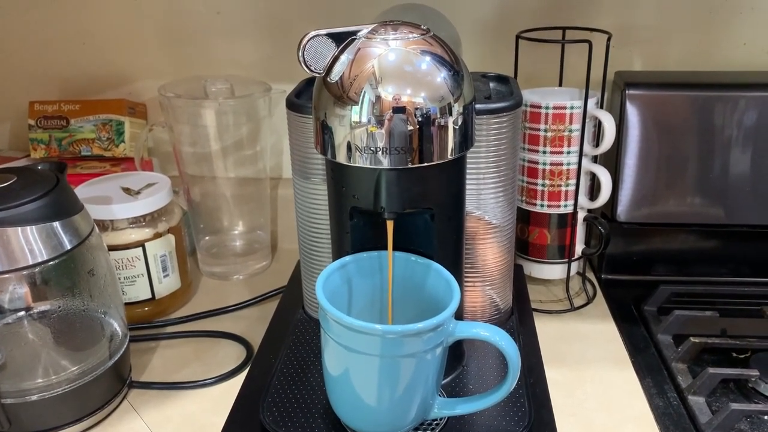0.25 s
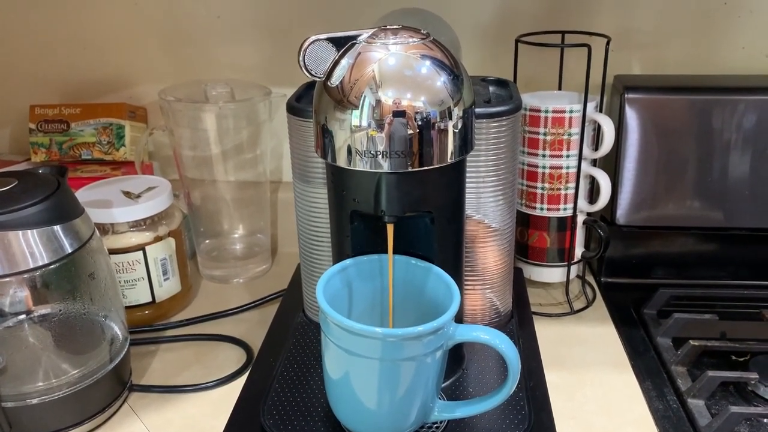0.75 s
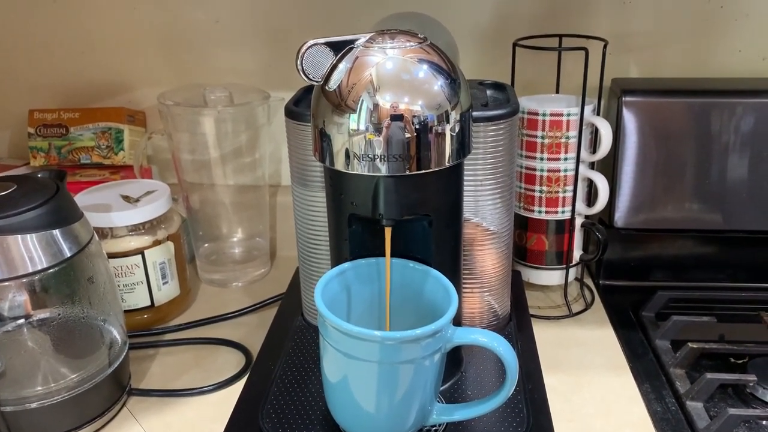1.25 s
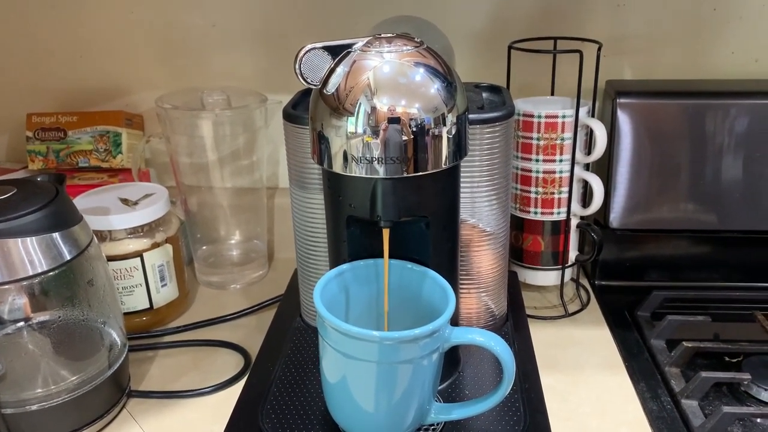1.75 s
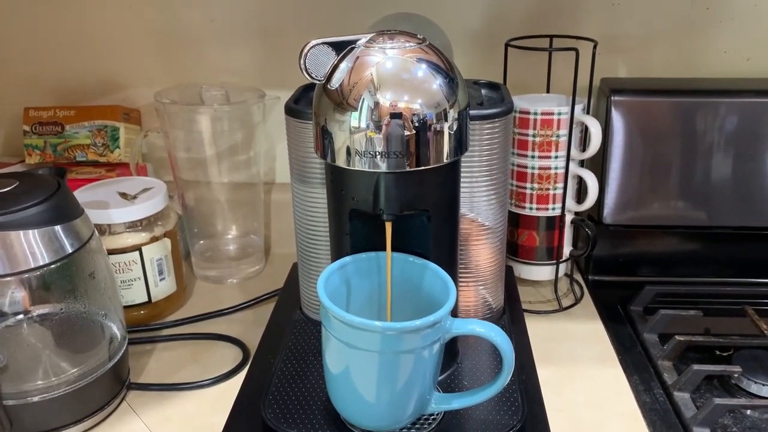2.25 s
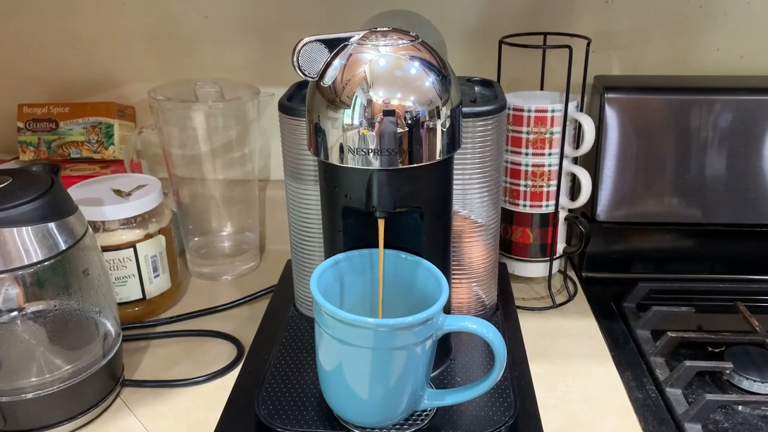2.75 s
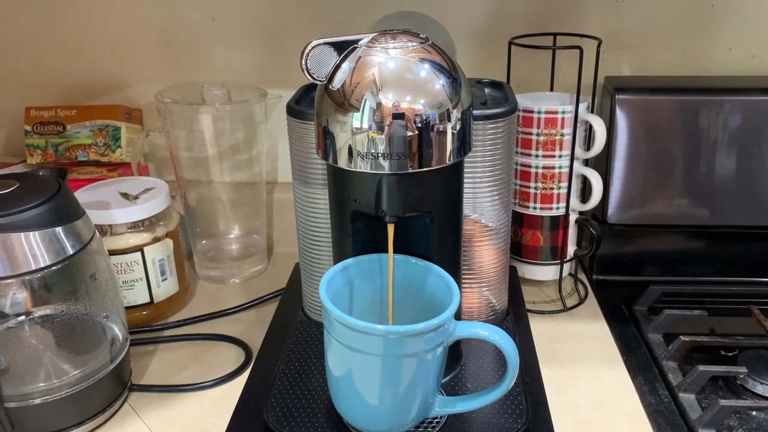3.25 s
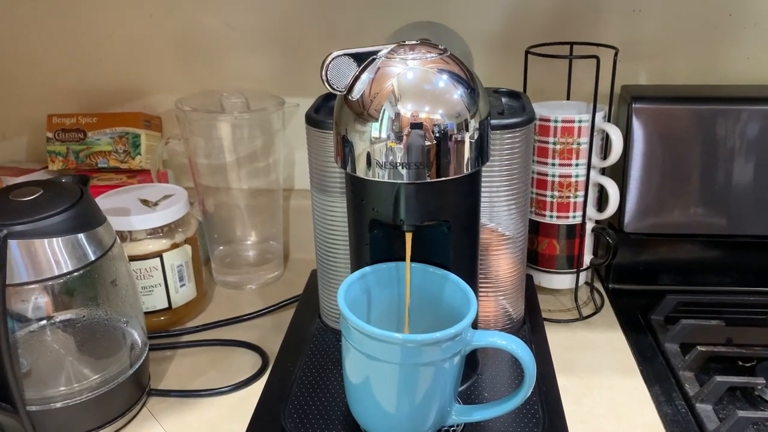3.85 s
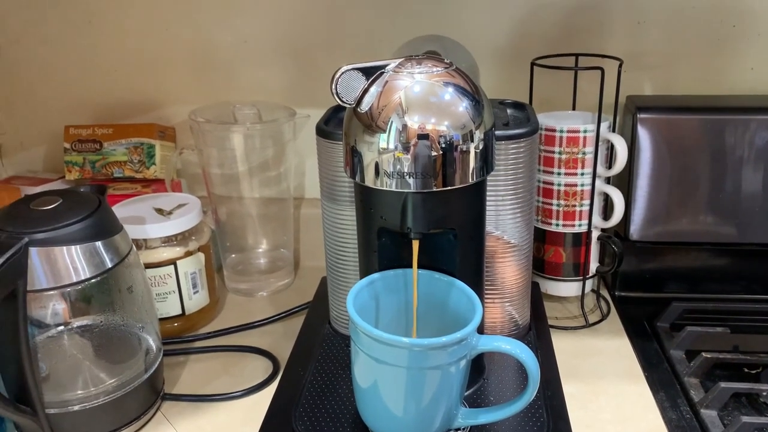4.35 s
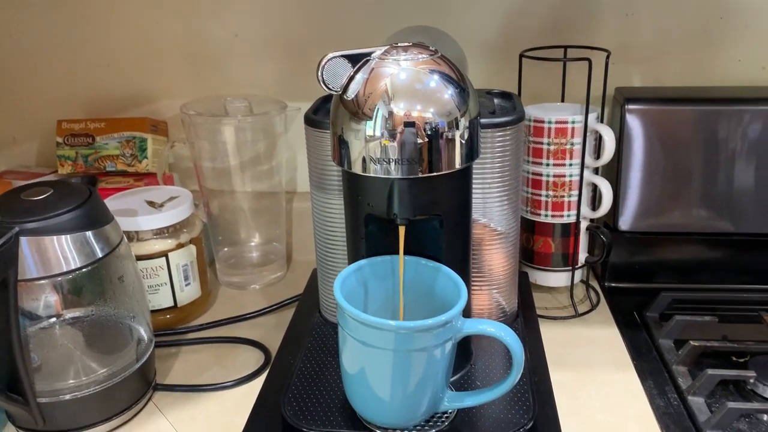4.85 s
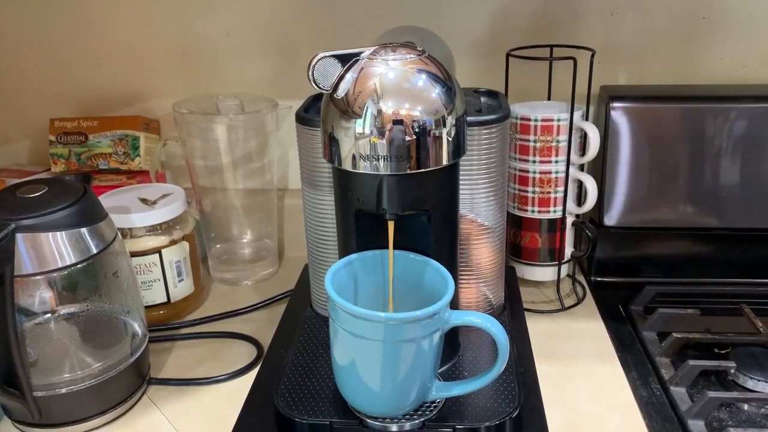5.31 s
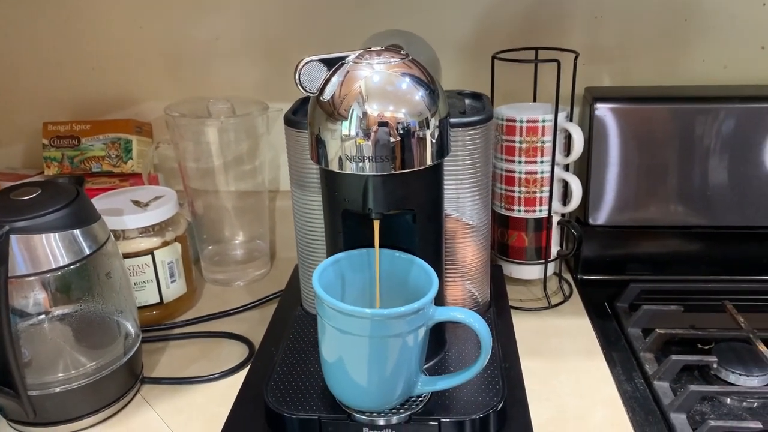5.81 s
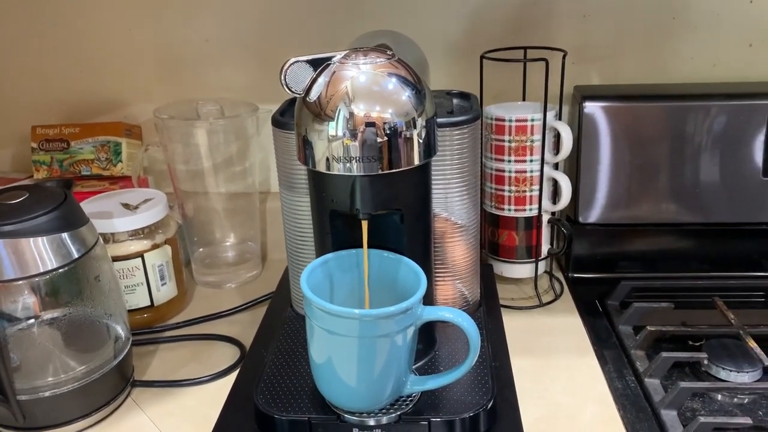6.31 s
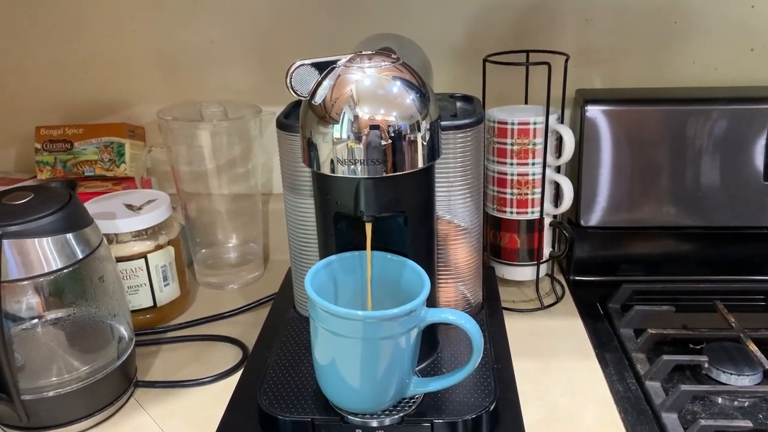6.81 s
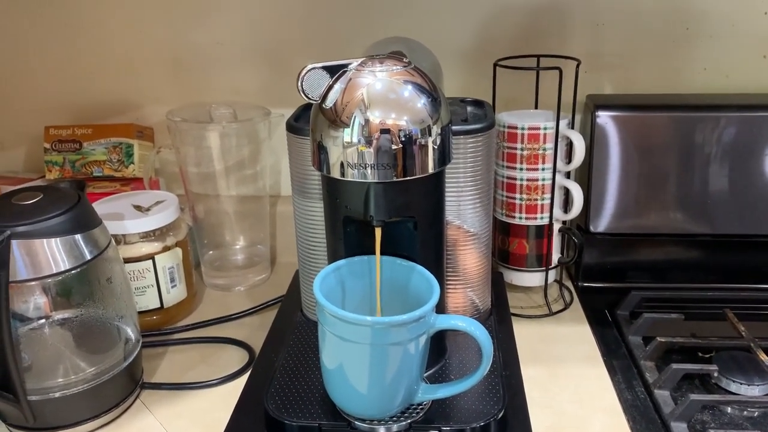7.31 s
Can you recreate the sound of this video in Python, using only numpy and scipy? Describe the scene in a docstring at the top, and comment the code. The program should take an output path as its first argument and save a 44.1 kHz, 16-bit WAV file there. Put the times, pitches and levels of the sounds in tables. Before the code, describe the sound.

Coffee streams into a mug throughout, pattering lightly, with larger drops landing in hollow plops and small splashes above a gentle gurgle. Underneath, a capsule coffee machine keeps up a constant electric hum, a slightly wavering whir and an airy hiss of spray. Nothing starts or stops. The sound is fairly quiet and picked up by a close phone microphone in a kitchen.

```python
"""A stream of coffee falls from a capsule machine into a mug on a kitchen counter, close to a phone.
Each drop excites the modes of the mug's air, heard as a plop and a ring with a splash, and the wall
behind reflects them. Underneath, the mug gurgles, the pump hums at harmonics of the mains, and the
capsule spins at some 62 turns a second, with a whir from its drive and a hiss of air and spray.
The same cycle of 1.87 s repeats throughout, in stereo."""
import sys
import numpy as np
from scipy import signal
from scipy.fft import rfft, irfft
from scipy.io import wavfile
from scipy.ndimage import uniform_filter1d

SR = 44100
rng = np.random.default_rng(int(sys.argv[2]) if len(sys.argv) > 2 else 0)


def wrap_up_sound(samples):
    """Save the sound to the file named by the first command line argument, as 16-bit audio."""
    columns = np.atleast_2d(samples).T
    # keep every value between -1 and 1, then stretch to whole-number steps
    tamed = np.clip(columns, -1, 1)
    steps = np.round(tamed * 32767).astype(np.int16)
    wavfile.write(sys.argv[1], SR, steps)


N = 333837

CYCLE = 82320  # samples
CYCLE_S, CYCLE_TIME_S = CYCLE / SR, np.arange(CYCLE) / SR
BINS_HZ = np.arange(CYCLE // 2 + 1) * SR / CYCLE
SIDES = np.array([[1], [-1]])  # left, right

# How alike left and right sound at each pitch, wide in the middle and nearly one signal
# in the high hiss: frequency_hz, likeness (0 to 1)
STEREO_LIKENESS = [(60, 0.8), (120, 1), (350, 0.78), (650, 0), (1100, 1), (2100, 0.22), (7200, 0.37),
                   (8400, 0.99), (15000, 1)]
# Phase lead of the left microphone port over the right: frequency_hz, lead_rad
PORT_LEAD = [(1100, 1), (3000, 1.7), (5200, 2.5), (6300, 0), (8600, -3.5), (11000, -6), (13600, -10),
             (15700, -12.5)]
# Level of the left port above the right: frequency_hz, difference_db
PORT_LEVEL_DIFFERENCE = [(400, 0.5), (3000, -.5), (5400, -5), (7000, 0.5)]
# Pump hum, in multiples of the mains frequency: harmonic, level_db
PUMP_HARMONICS = [(1, -63.0), (2, -47.7), (3, -65.9), (4, -58.3), (5, -49.5), (6, -50.3), (7, -65.7),
                  (8, -57.5), (9, -58.5), (10, -61.4), (11, -60.0), (13, -68.9), (15, -65.7), (18, -66.2)]
# Noise spectrum of the drive in its housing: frequency_hz, density_db_per_hz
WHIR_SPECTRUM = [(25, -105), (38, -84), (52, -79.5), (90, -80.5), (160, -78.5), (215, -79), (315, -74),
                 (410, -80.5), (510, -81), (690, -83.5), (760, -97), (830, -87), (930, -86.5),
                 (1100, -91.5), (1380, -88), (1900, -105.0)]
# Capsule tones, in multiples of the turn rate: harmonic, level_db
CAPSULE_HARMONICS = [(1, -73.0), (2, -62.8), (3, -63.4), (4, -68.4), (5, -63.0), (6, -57.4), (7, -70.0),
                     (9, -65.0), (10, -60.6), (11, -59.7), (12, -66.0), (13, -58.5), (14, -64.0),
                     (16, -62.3), (17, -65.8), (20, -69.8), (21, -70.8), (23, -73.1), (24, -69.1),
                     (25, -72.1), (27, -72.5), (29, -75.4), (31, -71.1), (48, -70.3)]
# Noise spectrum of air and spray around the capsule: frequency_hz, density_db_per_hz
HISS_SPECTRUM = [(900, -105.0), (1400, -94), (1950, -85), (2250, -90.5), (3200, -90), (4500, -86.5),
                 (6100, -88.5), (7500, -84.5), (8600, -81.5), (10000, -85.5), (11700, -92), (13000, -92.5),
                 (14400, -102), (15500, -94.5)]
# Narrow peaks and notches of the brewing head: centre_hz, width_hz, gain_db
HEAD_RESONANCES = [(2341, 22, 9.5), (2690, 190, 3.5), (3787, 21, 13.5), (4100, 44, 7.5), (4515, 46, 9),
                   (6970, 145, 8), (7200, 15, -4), (8150, 98, 6), (8800, 150, -12), (9880, 63, 5),
                   (10200, 76, 4), (11200, 78, 4), (12660, 130, 8)]
# Air modes along the mug's depth: pitch_hz, relative_db, t60_s
DEPTH_MODES = [(723, -3, 0.041), (828, -0.5, 0.028), (980, -5, 0.019), (1055, -2.5, 0.023),
               (1154, -9.5, 0.042), (1542, -2, 0.039)]
# Air modes across the mug, from wall to wall: pitch_hz, relative_db, t60_s
CROSS_MODES = [(2026, 1.5, 0.0097), (2630, 2, 0.018), (3370, 6.5, 0.0089), (3890, 6.5, 0.0044)]
# Large drops landing within one cycle: start_s, plop_db, plop_top_hz, ring_db
LARGE_DROPS = [(.163, -62, 1100, -47.5), (.2195, -42, 920, -67), (.2905, -41.5, 1050, -54),
               (.3175, -36, 1100, -50), (.358, -39, 1110, -53), (.5505, -43, 1300, -56),
               (.616, -45, 1300, -52.5), (.6475, -42.5, 2380, -40), (.677, -43, 1320, -46),
               (.761, -43.5, 1260, -50), (.8865, -29, 1360, -41.5), (1.031, -41, 1100, -55),
               (1.1335, -35, 1050, -39), (1.170, -62, 1100, -47), (1.1815, -39.5, 1030, -45),
               (1.3985, -47, 1090, -61), (1.526, -56, 1100, -50.5), (1.811, -42, 950, -58)]


def undb(db):
    """Amplitude ratio of a level in decibels."""
    return 10 ** (np.asarray(db) / 20)


def curve(table):
    """Linear interpolation of a table on a logarithmic frequency axis."""
    hz, value = np.transpose(table)
    return np.interp(np.log(BINS_HZ + 1), np.log(hz), value)


def fluctuation(rate_hz):
    """Low-pass Gaussian noise of unit variance, periodic over one cycle."""
    spectrum = rfft(rng.standard_normal(CYCLE)) * np.exp(-(BINS_HZ / rate_hz) ** 2) * (BINS_HZ > 0)
    drift = irfft(spectrum)
    return drift / drift.std()


def repeat(sound, overlap=256):
    """Periodic extension of one cycle; any overhang joins its start in an equal-power crossfade."""
    cycle = sound[:, :CYCLE].copy()
    if sound.shape[1] > CYCLE:
        fade = np.linspace(0, np.pi / 2, overlap)
        overhang = sound[:, CYCLE:CYCLE + overlap]
        cycle[:, :overlap] = sound[:, :overlap] * np.sin(fade) + overhang * np.cos(fade)
    return cycle[:, np.arange(N) % CYCLE]


def port_response():
    """Transfer functions of the two ports, each taking half the phase and level difference."""
    return np.exp(.5j * curve(PORT_LEAD) * SIDES) * undb(curve(PORT_LEVEL_DIFFERENCE) / 2 * SIDES)


def stereo_noise(density_db):
    """Stereo width: the less of one noise left and right share, the wider it sounds."""
    shared, own = rfft(rng.standard_normal((2, CYCLE)))
    likeness = np.clip(curve(STEREO_LIKENESS), 0, 1)
    right = likeness * shared + np.sqrt(1 - likeness ** 2) * own
    return irfft(np.array([shared, right]) * port_response() * undb(density_db)) * np.sqrt(SR / 2)


def partial(phase, pitch_hz, level_db, hz_per_rad=1300):
    """A sinusoid whose phase difference between the ports grows with frequency, up to 2 radians."""
    start, side = rng.uniform(0, 2 * np.pi), rng.choice([-1, 1])
    offset = side * min(pitch_hz / hz_per_rad, 2) / 2 * SIDES
    return np.sqrt(2) * undb(level_db) * np.sin(phase + start + offset)


def kitchen(spectrum, wall_s=0.0091, smear_s=.0025, wall_db=-3.5, tail_db=-12, t60_s=0.26):
    """Superposition of the direct sound, an early reflection from the wall and a reverberant tail."""
    t = np.arange(12000) / SR
    wall = rfft(rng.standard_normal(len(t)) * np.exp(-((t - wall_s) / smear_s) ** 2), CYCLE)
    wall = wall / (abs(wall) + .2 * abs(wall).mean())  # all pitches reflect about equally
    tail = rng.standard_normal((2, len(t))) * undb(-60 * t / t60_s) * (t > wall_s)
    tail = rfft(tail / np.sqrt(np.sum(tail[0] ** 2)), CYCLE)
    return irfft(spectrum * (port_response() * (1 + undb(wall_db) * wall) + undb(tail_db) * tail))


def pump_hum(mains_hz=60, waver_db=0.16):
    """Forced vibration at harmonics of the mains, each wavering slightly with the load."""
    phase = 2 * np.pi * mains_hz * CYCLE_TIME_S
    return sum(partial(k * phase, k * mains_hz, db + waver_db * fluctuation(20))
               for k, db in PUMP_HARMONICS)


def drive_whir(uneven_db=2.56):
    """Structure-borne noise: the drive shakes the housing, a little unevenly."""
    return stereo_noise(curve(WHIR_SPECTRUM)) * undb(uneven_db * fluctuation(31))


def capsule_spin(turn_hz=62.42, wander=0.00206, flutter_db=3.0, overlap=256):
    """Frequency modulation: wandering speed broadens the high harmonics most; each flutters in level."""
    wrapped = np.arange(CYCLE + overlap) % CYCLE
    speed_hz = turn_hz * (1 + wander * fluctuation(5.7)[wrapped])
    phase = 2 * np.pi * np.cumsum(speed_hz) / SR
    return sum(partial(k * phase, k * turn_hz, db + flutter_db * fluctuation(7.9)[wrapped])
               for k, db in CAPSULE_HARMONICS)


def spray_hiss(flicker_db=0.6, ripple_db=2.5, ripple_bins=90):
    """Broadband excitation: air and spray drive the resonances of the brewing head."""
    resonance_db = sum(db / (1 + (2 * (BINS_HZ - hz) / width) ** 2) for hz, width, db in HEAD_RESONANCES)
    weak_modes = uniform_filter1d(rng.standard_normal(len(BINS_HZ)), ripple_bins) * np.sqrt(ripple_bins)
    density_db = curve(HISS_SPECTRUM) + resonance_db + ripple_db * weak_modes
    return stereo_noise(density_db) * undb(flicker_db * fluctuation(77))


def swell(start_s=1.66, attack_s=.15, hold_s=.42, release_s=.12):
    """Trapezoidal envelope from 0 to 1 and back, once a cycle."""
    since_s = (CYCLE_TIME_S - start_s) % CYCLE_S
    return np.interp(since_s, np.cumsum([0, attack_s, hold_s, release_s]), [0, 1, 1, 0])


def air_resonance(centre_hz, width_hz, level_db, rough_db=1.5):
    """A randomly driven resonance gives a narrow band of noise, here roughened in level."""
    band = stereo_noise(-20 * np.log10(1 + (2 * (BINS_HZ - centre_hz) / width_hz) ** 2))
    return band / band.std() * undb(level_db + rough_db * fluctuation(38))


def mug_murmur(gurgle_db=-66, swell_db=9.5, trickle_db=-70):
    """Sustained excitation of the mug's air by the stream: a swelling gurgle and a steady trickle."""
    gurgle = air_resonance(centre_hz=815, width_hz=80, level_db=gurgle_db + swell_db * swell())
    trickle = air_resonance(centre_hz=1080, width_hz=210, level_db=trickle_db)
    return gurgle + trickle


def damped_modes(modes, attack_s):
    """Free vibration: modes build up over a soft contact and decay exponentially."""
    t = np.arange(4096) / SR
    waves = sum(undb(db - 60 * t / t60) * np.sin(2 * np.pi * hz * (t - attack_s)) for hz, db, t60 in modes)
    return waves * (1 - np.exp(-(t / attack_s) ** 2))


def impacts(start_s, level_db, response):
    """Convolution of impulses with a response, as a spectrum; level_db is the rms of its first 6 ms."""
    impulses = np.zeros(CYCLE)
    np.add.at(impulses, np.round(start_s * SR).astype(int) % CYCLE, undb(level_db))
    onset_rms = np.sqrt(np.mean(response[:265] ** 2))
    return rfft(impulses) * rfft(response / onset_rms, CYCLE)


def splash(t60_s=0.0055, centre_hz=12000, half_width_hz=5500, size=1024):
    """A splash is a broadband transient: treble noise with a fast exponential decay."""
    burst = rng.standard_normal(size) * undb(-60 * np.arange(size) / SR / t60_s)
    return irfft(rfft(burst, CYCLE) / (1 + ((BINS_HZ - centre_hz) / half_width_hz) ** 4))[:size]


def plop(top_hz, low_hz=610):
    """Impulse response of the mug's depth modes; a softer landing excites a narrower band."""
    band = signal.butter(4, [low_hz, top_hz], "bandpass", fs=SR, output="sos")
    return signal.sosfilt(band, damped_modes(DEPTH_MODES, attack_s=0.00026))


def coffee_stream(small_plop_db=-53, small_ring_db=-60, scatter_db=1.5, small_count=50):
    """Impact excitation of the mug's air: large drops plop, ring and splash; small ones patter between."""
    start_s, plop_db, top_hz, ring_db = np.transpose(LARGE_DROPS)
    ring = damped_modes(CROSS_MODES, attack_s=0.00029)
    # A harder landing splashes more: 4 dB per octave of the plop's upper edge.
    splash_db = ring_db - 6 + 4 * np.log2(top_hz / 1000)
    large = sum(impacts(s, db, plop(hz)) for s, db, hz in zip(start_s, plop_db, top_hz))
    large += impacts(start_s, ring_db, ring) + impacts(start_s, splash_db, splash())
    patter_s = rng.uniform(0, CYCLE_S, small_count)
    offset_db = scatter_db * np.clip(rng.standard_normal((small_count, 2)), -2, 2)
    small = impacts(patter_s, small_plop_db + offset_db[:, 0], plop(top_hz=1150))
    small += impacts(patter_s, small_ring_db + offset_db[:, 1], ring)
    return kitchen(large + small)


def scene():
    """Linear superposition of the machine and its stream, cycle after cycle."""
    cycle = pump_hum() + drive_whir() + spray_hiss() + mug_murmur() + coffee_stream()
    return repeat(cycle) + repeat(capsule_spin())


def record(dry, cutoff_hz=15650):
    """Band limiting: the phone's steep low-pass filter removes the highest treble."""
    return signal.sosfilt(signal.ellip(10, .1, 80, cutoff_hz, fs=SR, output="sos"), dry)


dry = scene()
out = record(dry)
wrap_up_sound(out)
```